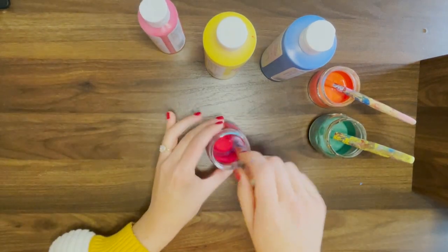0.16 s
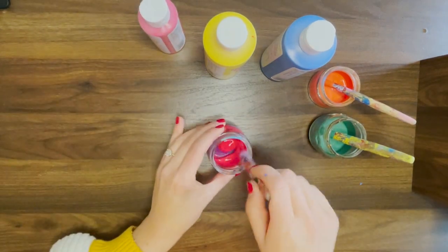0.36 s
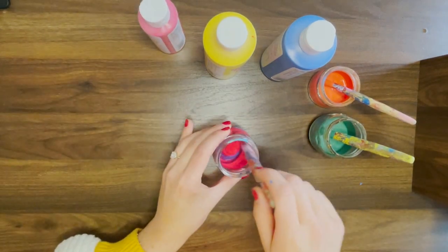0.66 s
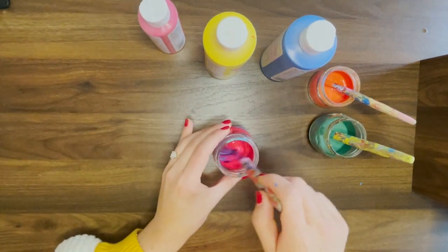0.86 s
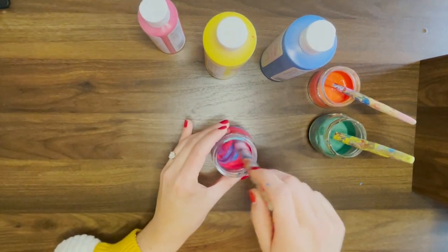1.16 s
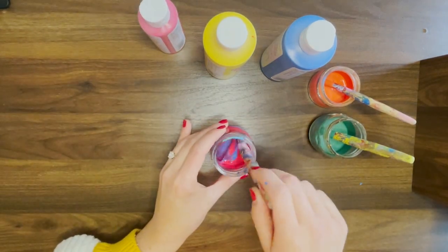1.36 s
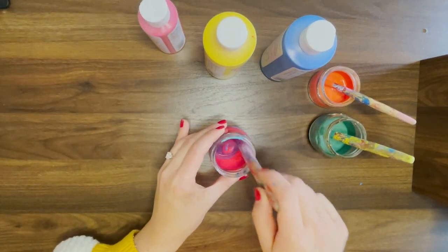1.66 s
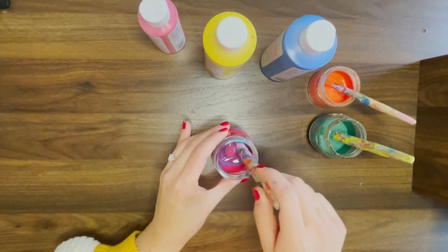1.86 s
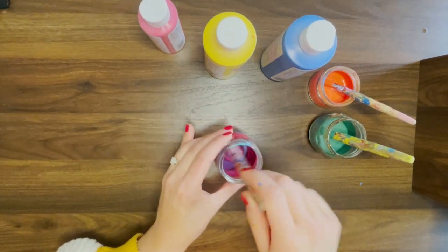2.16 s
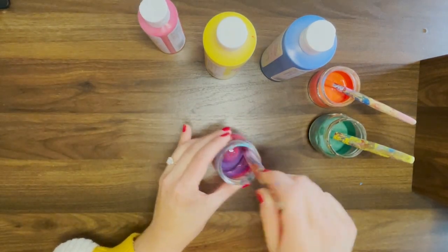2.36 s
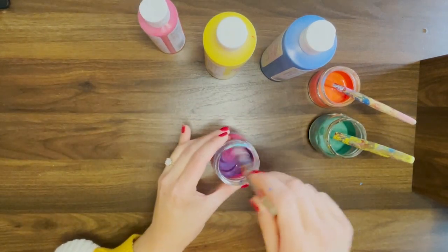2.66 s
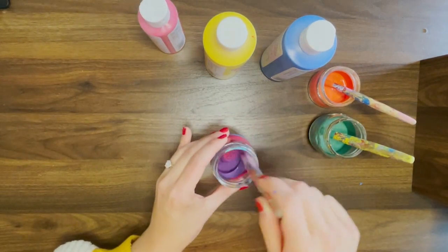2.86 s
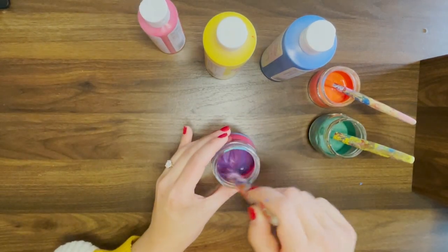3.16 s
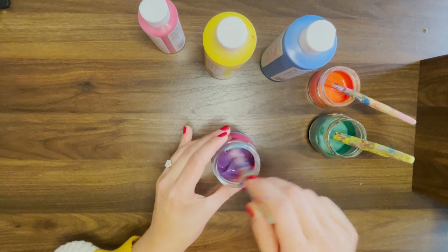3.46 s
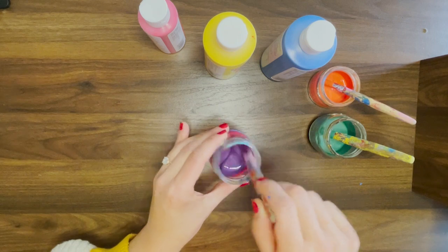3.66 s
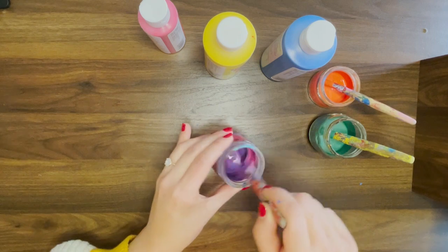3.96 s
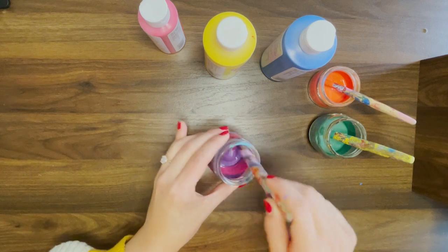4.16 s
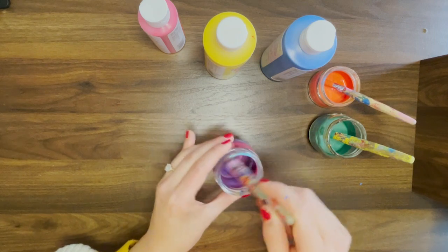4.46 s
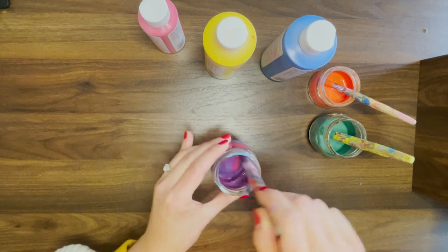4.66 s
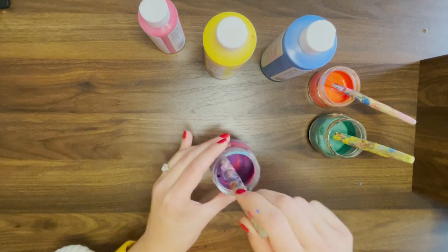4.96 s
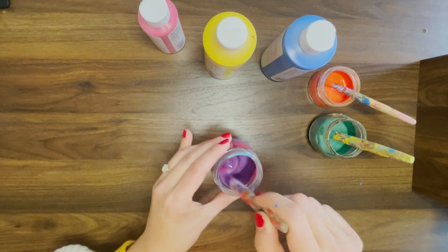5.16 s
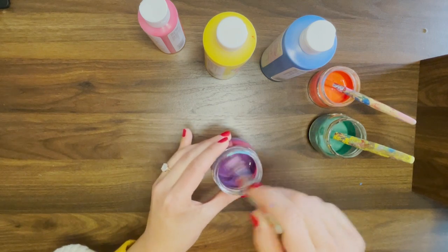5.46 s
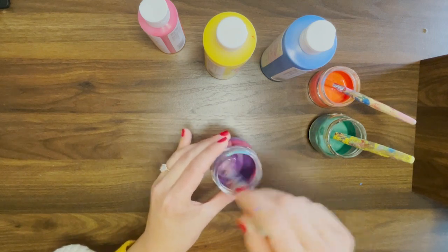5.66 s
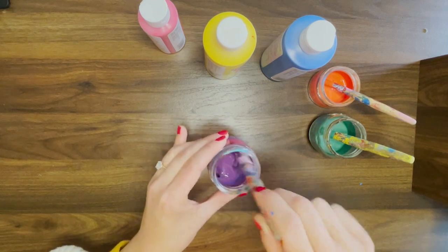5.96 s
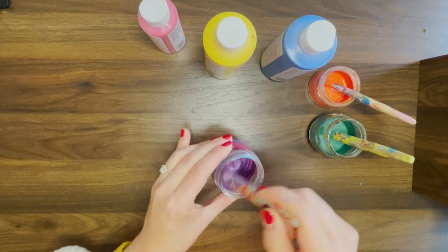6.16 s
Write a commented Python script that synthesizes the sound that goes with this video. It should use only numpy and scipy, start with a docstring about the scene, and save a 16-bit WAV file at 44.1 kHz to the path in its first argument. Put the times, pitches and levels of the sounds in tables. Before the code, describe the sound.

A paintbrush stirs paint in a small glass jar on a wooden table. The handle clicks against the glass several times a second, unevenly, mixing light ticks with sharper, briefly ringing clinks. Between them come faint wet rubbing and soft bristle swishes. The clicks soften for a while, then return and are strongest near the end. Heard close up in a quiet room with a low rumble.

```python
"""A brush handle clicks on the rim of a hand-held glass jar as paint is stirred at a wooden table.
Each impact excites the damped modes of the glass and of the air inside. Between clicks the handle rubs
the wet wall by stick-slip friction, the bristles swish, and the sliding jar drives the table's resonances.
Two close microphone ports above hear this in a quiet room, with low rumble and a faint appliance hum."""
import sys
import numpy as np
from scipy import signal
from scipy.fft import rfft, irfft, next_fast_len
from scipy.io import wavfile

SR = 44100
rng = np.random.default_rng(int(sys.argv[2]) if len(sys.argv) > 2 else 0)


def persist_wave(psi):
    """Save psi, clipped to +-1, as 16-bit WAV."""
    counts = np.round(np.clip(psi, -1, 1) * 32767).astype(np.int16)
    wavfile.write(sys.argv[1], SR, np.atleast_2d(counts).T)


N = 278963

# Background spectrum: f/Hz, relative density level/dB
RUMBLE_SPECTRUM = [(12, -45.5), (30, -8), (45, -1), (90, -0.5), (125, 0.5), (260, -10), (370, -17.5),
                   (600, -21.5), (830, -23.5), (1500, -25.5), (3000, -41.5), (6000, -49), (12000, -61.5),
                   (14000, -89)]
# Likeness of the rumble at the two ports: f/Hz, correlation
RUMBLE_COHERENCE = [(30, .9), (190, 0.75), (300, 0.31), (640, 0.036), (3000, 0.12)]
# Appliance tones: f/Hz, bandwidth/Hz, level/dB
HUM_TONES = [(672, 7.0, -83), (830, 7.0, -77.5), (950, 10.0, -89.5)]
# Reverberation time: f/Hz, t60/s
ROOM_DECAY = [(500, 0.093), (1500, 0.38), (6000, 0.33), (11000, 0.13), (15000, 0.033)]
# Reverberant spectrum: f/Hz, level/dB
ROOM_SPECTRUM = [(500, -6), (1500, -10.5), (3000, -8.5), (6000, -8), (11000, -3.5), (12800, -31.5),
                 (15000, -40.5)]
# Jar foot dragging on the table: t/s, duration/s, level/dB
JAR_SLIDES = [(0.006, 0.054, -43), (2.277, 0.0097, -53), (2.929, .04, -61.5), (3.873, 0.017, -63.5)]
# Table modes, a list per slide (the last two slides share one): f/Hz, bandwidth/Hz, level/dB
BOARD_MODES = [
    [(363, 8.1, 10), (417, 42, 5.5), (530, 88, -5.5), (960, 41, -8.5)],
    [(293, 18, -3), (448, 190, 2), (749, 390, -25), (1650, 800, 5.5)],
    [(290, 26, 0.5), (445, 99, -16), (840, 58, -12), (910, 80, 4)],
]
# Bristle sweeps through the paint: t/s, duration/s, level/dB
BRISTLE_SWEEPS = [(.07, 0.02, -63), (.31, 0.085, -75), (.6, 0.035, -74), (.98, .04, -83), (1.12, 0.56, -79),
                  (1.72, 0.013, -69), (2.03, 0.022, -70.5), (2.2, 0.14, -67), (2.45, 0.071, -67),
                  (2.72, 0.13, -69.5), (3.12, 0.08, -72), (3.3, 0.03, -74), (3.45, 0.23, -67),
                  (3.8, 0.039, -72), (3.93, 0.26, -73.5), (4.1, 0.19, -71), (4.55, 0.058, -64.5),
                  (4.72, 0.096, -70), (5.07, 0.049, -67), (5.3, .1, -62.5), (5.5, 0.2, -69),
                  (5.88, 0.11, -69.5), (6.05, .1, -74), (6.17, 0.042, -66.5), (6.29, .04, -73.5)]
# Spectrum of the swish: f/Hz, relative density level/dB
BRISTLE_SPECTRUM = [(2000, -10), (4000, -2.5), (5200, -2.5), (6400, 8.5), (8300, -16.5), (10000, -8.5),
                    (11700, -12), (12300, -14.5), (13500, -40)]
# Drags along the wet wall: t/s, duration/s, level/dB, relative smack level/dB
WALL_RUBS = [(0.137, 0.017, -66, 3.5), (.19, 0.024, -62, -9), (0.249, 0.018, -58.5, -6),
             (0.558, 0.03, -62, -16), (0.646, 0.029, -60.5, -10), (1.731, 0.021, -63.5, -6),
             (2.08, 0.069, -64, -6.5), (2.17, 0.092, -63.5, -13), (2.269, 0.013, -53.5, -8),
             (2.328, 0.063, -60, -6.5), (2.45, 0.076, -65.5, -3), (2.524, 0.057, -61.5, 0.5),
             (2.605, 0.049, -61, -13), (2.732, 0.05, -70, -3), (2.793, 0.017, -59, -2),
             (2.882, 0.028, -58.5, -10), (3.7, 0.14, -64, -10), (3.838, 0.019, -55.5, -17),
             (3.872, 0.028, -59.5, 1.5), (3.926, 0.024, -57, -3.5), (3.985, .04, -63.5, -7),
             (4.06, 0.022, -55, 0.5), (4.12, 0.041, -66, 1), (4.264, 0.024, -64.5, -6.5),
             (4.622, 0.11, -70.5, 1), (4.706, 0.15, -65, -4), (5.107, 0.036, -61.5, 0),
             (5.135, 0.016, -53, -18), (5.53, 0.037, -50, -9), (5.693, 0.05, -62.5, -5),
             (5.895, 0.027, -65.5, -8), (5.97, 0.16, -73, -13), (6.101, 0.084, -60.5, -3.5),
             (6.171, 0.019, -56, -5.5), (6.286, 0.051, -59.5, -16)]
# Wet smacks of the paint film: f/Hz, level/dB, t60/s
FILM_MODES = [(1784, -3.5, .014), (2085, -3.5, 0.0092), (2320, -8, 0.007), (6100, -12, 0.01)]
# Modes of the enclosed air (lowest four), then of wall and rim: f/Hz, level/dB, t60/s
JAR_MODES = [(1120, -8, 0.0059), (1333.5, -2.5, 0.023), (1482.5, 5, 0.013), (1740, -7, 0.021),
             (2000, -15.5, 0.0055), (2715, -4, 0.012), (3425, -6.5, 0.0012), (4227, -10, 0.01),
             (4790, -4, 0.009), (5320, -13, 0.034), (5788.4, 0.5, 0.045), (5842, 3, 0.034),
             (6050, -17.5, .04), (6720, -0.5, 0.01), (10500, -13, 0.0027), (11270, -3, 0.003),
             (14800, -14, .006)]
# Four bands that set the timbre (air thump, wall, glass ring, tick): f/Hz
BAND_HZ = [1450, 3200, 5800, 11000]
# Timbre of rubbing: relative level/dB in each band
RUB_BAND_DB = [1.5, -12.5, -16.5, -34.5]
# Noise burst of an impact: f/Hz, relative level/dB
CRACK_SPECTRUM = [(700, -47.5), (1000, -24.5), (1500, 4.5), (3000, 3), (5500, 2), (7300, 0.5), (8200, -13),
                  (11500, -12.5), (13000, -17), (16500, -23)]
# Handle striking glass: t/s, level/dB, then relative level/dB in each of the four bands
HANDLE_IMPACTS = [(0.068, -24.5, -11.5, -11, -21.5, -14.5), (0.156, -34.5, -14, -16, -24, -45),
                  (0.241, -42, -4, -29, -17, -23), (0.27, -38.5, -10.5, -13.5, -8.5, -15),
                  (0.361, -18.5, -13.5, -15, -9.5, -22), (0.527, -40, -10.5, -17, -18.5, -17),
                  (0.57, -36.5, -11, -14, -17.5, -17), (0.644, -39, -10, -30, -30, -26),
                  (0.931, -31, -8.5, -11, -8, -18), (1.059, -41, -8, -11, -27.5, -19),
                  (1.155, -16.5, -10, -17.5, -5, -18.5), (1.251, -30, -8.5, -14, -15.5, -14),
                  (1.364, -6.5, -10, -18, -3.5, -11), (1.47, -18, -8.5, -10, -4.5, -4),
                  (1.661, -24.5, -6, -23.5, -23.5, -17), (1.868, -32, -4, -17, -13, -16.5),
                  (1.973, -24.5, -6.5, -13.5, -15.5, -13), (2.077, -48.5, -2, -15, -30.5, -32.5),
                  (2.341, -32.5, -10, -31.5, -16.5, -49), (2.424, -42.5, -1.5, -20, -16.5, -28),
                  (2.484, -46.5, -5, -12, -12, -6), (2.522, -44, -3.5, -11, -10.5, -44),
                  (2.544, -37, -4, -27, -32, -25), (2.613, -43, -11, -40, -39, -54.5),
                  (2.626, -38, -6, -37, -29, -27), (2.784, -26.5, -7, -15.5, -19.5, -14),
                  (2.874, -44, -1, -34, -39, -28), (3.139, -22, -5.5, -19, -15, -11),
                  (3.297, -51, -25, -24.5, -14, 1), (3.331, -42, -8.5, -14.5, -18, -7),
                  (3.429, -9, -8.5, -21, -6, -15.5), (3.603, -18, -5.5, -17.5, -15.5, -13.5),
                  (3.83, -37, -3.5, -14.5, -15.5, -14), (4.055, -33.5, -11.5, -24, -23.5, -36),
                  (4.185, -23.5, -9, -12, -20, -7.5), (4.381, -14.5, -5.5, -16.5, -16.5, -13.5),
                  (4.561, -20, -12, -19.5, -11.5, -17.5), (4.666, -38, -19, -3, -17, -9),
                  (4.837, -38.5, -7.5, -25.5, -39, -36), (4.94, -11.5, -11.5, -8.5, -20, -20),
                  (5.063, -26, -11.5, -18.5, -19.5, -25), (5.212, -35, 0, -34, -34.5, -19),
                  (5.318, -9.5, -9, -21.5, -9, -10), (5.433, -6, -16, -14, -8, -11.5),
                  (5.507, -20, -13, -29, -15, -18), (5.679, -24.5, -8.5, -20.5, -27, -27),
                  (5.838, -21, -10, -8.5, -22.5, -23), (5.968, -47, -4, -30, -19, -21),
                  (6.17, -41.5, -4, -18, -15.5, -14), (6.288, -49.5, -9.5, -2, -28, -10),
                  (6.305, -32, -20, -13, -11.5, 0)]


def from_db(db):
    """Amplitude ratio of a level in decibels."""
    return 10 ** (np.asarray(db) / 20)


def unit_rms(x):
    """Normalisation to unit mean power."""
    return x / np.sqrt(np.mean(x ** 2) + 1e-20)


def bin_hz(size):
    """Fourier frequencies, held above zero for a logarithmic axis."""
    return np.maximum(np.fft.rfftfreq(size, 1 / SR), 1)


def at_hz(points, hz):
    """Interpolation of (frequency, value) points over log frequency."""
    points = np.array(points)
    return np.interp(np.log(hz), np.log(points[:, 0]), points[:, 1])


def timbre_db(band_db, hz):
    """Spectral envelope through the four band levels."""
    return at_hz(list(zip(BAND_HZ, band_db)), hz)


def butterworth(x, order, hz, kind):
    """Filtering with a maximally flat passband."""
    return signal.sosfilt(signal.butter(order, hz, kind, fs=SR, output="sos"), x)


def drift(rate_hz):
    """Slow random modulation of unit rms: noise through two one-pole low-passes."""
    step, settle = 16, 3000
    pole = np.exp(-2 * np.pi * rate_hz * step / SR)
    noise = rng.standard_normal(N // step + settle + 2)
    slow = signal.lfilter([1], [1, -2 * pole, pole * pole], noise)[settle:]
    return np.interp(np.arange(N) / step, np.arange(len(slow)), unit_rms(slow))


def ring(force, hz, t60):
    """Damped oscillator: a unit impulse starts a decaying sine of unit amplitude."""
    r, w = from_db(-60 / (t60 * SR)), 2 * np.pi * hz / SR
    return signal.lfilter([0, np.sin(w)], [1, -2 * r * np.cos(w), r * r], force + 1e-18)


def resonance(force, hz, width_hz):
    """Forced response at unit rms; decay time is inversely proportional to bandwidth."""
    return unit_rms(ring(force, hz, np.log(1000) / (np.pi * width_hz)))


def strike(blows, hz, t60, contact_s=0.0045):
    """Finite contact time: a short ring drives the mode, which swells before it decays."""
    return ring(ring(blows, hz, contact_s), hz, t60) * 2 * np.log(1000) / (contact_s * SR)


def strokes(rows, rise_db_per_s, fall_db_per_s):
    """Level in dB of each stroke: exponential growth up to its start, a hold, exponential decay."""
    t = np.arange(N) / SR
    return [db - rise_db_per_s * np.maximum(start - t, 0)
            - fall_db_per_s * np.maximum(t - start - duration, 0)
            for start, duration, db, *_ in rows]


def loudest(levels_db, rest_db):
    """Upper envelope of the strokes, never below the resting level."""
    return np.maximum(np.max(levels_db, axis=0), rest_db)


def impulses(per_s, uneven_db, limit):
    """Poisson impulses of random sign, their levels spread over at most limit * uneven_db."""
    occurs = rng.random(N) < per_s / SR
    level_db = uneven_db * np.minimum(rng.exponential(1, N), limit)
    return occurs * from_db(level_db) * rng.choice([-1, 1], N)


def rumble(level_db=-60.5):
    """Distant air and traffic noise, coherent between the ports only at long wavelengths."""
    size = next_fast_len(N)
    hz = bin_hz(size)
    mid, side = rfft(rng.standard_normal((2, size))) * from_db(at_hz(RUMBLE_SPECTRUM, hz))
    coherence = np.clip(at_hz(RUMBLE_COHERENCE, hz), 0, 1)
    spectra = np.sqrt(1 + coherence) * mid + np.sqrt(1 - coherence) * side * [[1], [-1]]
    pair = unit_rms(irfft(spectra, size)[:, :N])
    swell_db = 1.2 * drift(1.5)
    return from_db(level_db + swell_db) * pair * from_db([[-2.0], [2.0]])  # weaker on the left


def hum():
    """Appliance hum: narrow-band noise is heard as wavering tones, uncorrelated between the ports."""
    return sum(from_db(db) * resonance(rng.standard_normal((2, N)), hz, width)
               for hz, width, db in HUM_TONES)


def room(source, gap_s=0.00087, ceiling_s=0.0143, ceiling_db=-18):
    """Reverberation: a diffuse field decays exponentially in each band; the ceiling adds one echo."""
    t, tail = np.arange(SR // 2) / SR, 0
    edges = 350 * 2 ** np.arange(0, 6, .5)  # half octaves
    for low, high in zip(edges, edges[1:]):
        hz = np.sqrt(low * high)
        band = butterworth(rng.standard_normal((2, len(t))), 2, [low, high], "band")
        t60 = at_hz(ROOM_DECAY, hz)
        decay = from_db(at_hz(ROOM_SPECTRUM, hz) - 60 * t / t60)
        tail = tail + band * decay / np.sqrt(t60 * SR / np.log(1e6))
    tail = tail * np.clip(t / gap_s - 1, 0, 1)  # silent until the first reflection
    echo = round(ceiling_s * SR)
    tail[:, echo:echo + 3] += from_db(ceiling_db) * np.array([.25, .5, .25])  # smeared, so duller
    return signal.fftconvolve(source[None], tail, axes=1)[:, :N]


def jar_slides():
    """Forced vibration: the glass foot judders over the grain and drives the modes of the board."""
    levels_db = strokes(JAR_SLIDES, rise_db_per_s=500, fall_db_per_s=278)
    out = 0
    for level_db, modes in zip(levels_db, BOARD_MODES + BOARD_MODES[-1:]):
        judder = rng.standard_normal(N) * from_db(3.4 * drift(85.0))
        board = sum(from_db(db) * resonance(judder, hz, width) for hz, width, db in modes)
        out = out + from_db(level_db) * unit_rms(board)
    return out


def bristle_swish():
    """Shot noise: hairs peel off the sticky wall in snaps so dense that they merge into a swish."""
    sweep_db = loudest(strokes(BRISTLE_SWEEPS, rise_db_per_s=249, fall_db_per_s=201.5), rest_db=-86)
    snaps = impulses(per_s=4900.0, uneven_db=5.0, limit=3)
    flicker_db = 3.5 * drift(18.0)
    size = next_fast_len(N)
    spectrum = rfft(snaps, size) * from_db(at_hz(BRISTLE_SPECTRUM, bin_hz(size)))
    return from_db(sweep_db + flicker_db) * unit_rms(irfft(spectrum, size)[:N])


def wall_rubbing(slips_per_s=1100.0, clumps_db=4.5):
    """Stick-slip friction: clusters of tiny contacts excite the jar and the wet paint film."""
    levels_db = strokes(WALL_RUBS, rise_db_per_s=900, fall_db_per_s=263)
    smack_db = np.array(WALL_RUBS)[np.argmax(levels_db, axis=0), 3]  # set by the strongest drag
    slips = impulses(slips_per_s * from_db(clumps_db * drift(30.0)), uneven_db=4.5, limit=4)
    jar, film = 0, 0
    for hz, mode_db, t60 in JAR_MODES:  # each mode takes a random half of the slips
        gain = from_db(mode_db + timbre_db(RUB_BAND_DB, hz))
        jar = jar + gain * strike(slips * (rng.random(N) < .5), hz, t60)
    for hz, mode_db, t60 in FILM_MODES:
        film = film + from_db(mode_db) * strike(slips * (rng.random(N) < .5), hz, t60)
    envelope = from_db(loudest(levels_db, rest_db=-79.5))
    rubbing = envelope * (unit_rms(jar) + from_db(smack_db) * unit_rms(film))
    return butterworth(rubbing, 2, 900, "high")


def contact_crack(level_db, band_db, size, rise_s=0.0013):
    """A brief contact has a broad spectrum: a noise burst that peaks at rise_s and dies away."""
    t, hz = np.arange(size) / SR, bin_hz(size)
    spectrum_db = level_db + at_hz(CRACK_SPECTRUM, hz) + timbre_db(band_db, hz)
    noise = irfft(rfft(rng.standard_normal(size)) * from_db(spectrum_db))
    return noise * t / rise_s * np.exp(1 - t / rise_s)


def handle_clicks(chatter_s=0.0018, bounce_db=-9, modes_db=-3, lobe_db=4.5, crack_samples=512):
    """Modal superposition: each impact and its weaker bounce ring all the jar's modes, over a crack."""
    impacts = np.array(HANDLE_IMPACTS)
    count, levels_db, bands_db = len(impacts), impacts[:, 1], impacts[:, 2:6]
    onsets = (impacts[:, 0] * SR).astype(int)
    bounce_delays = (chatter_s * SR * (1 + rng.random(count))).astype(int)
    bounces = np.minimum(onsets + bounce_delays, N - 1)
    signs = rng.choice([-1, 1], (count, len(JAR_MODES)))
    signs[:, 0] = -signs[:, 1]  # in antiphase, the lowest two modes fill the gap between them
    out = np.zeros((2, N + crack_samples))
    for sign, (hz, mode_db, t60) in zip(signs.T, JAR_MODES):
        colour_db = np.array([timbre_db(band_db, hz) for band_db in bands_db])
        blows = sign * from_db(levels_db + colour_db + mode_db + modes_db)
        # Rim modes radiate in lobes: louder and one sample later at the left port.
        left = (1, from_db(lobe_db)) if 4000 < hz < 7500 else (0, 1)
        force = np.zeros_like(out)
        for port, (delay, gain) in enumerate([left, (0, 1)]):
            force[port, onsets + delay] = blows * gain
            force[port, bounces + delay] += blows * gain * from_db(bounce_db)
        out += strike(force, hz, t60)
    for onset, level_db, band_db in zip(onsets, levels_db, bands_db):
        out[:, onset:onset + crack_samples] += contact_crack(level_db, band_db, crack_samples)
    return butterworth(out[:, :N], 4, 800, "high")  # so small a jar radiates no bass


def scene(port_lag_s=0.00009):
    """Superposition of direct sound, room and background; the nearer, left port hears the jar first."""
    near = handle_clicks() + wall_rubbing() + bristle_swish() + jar_slides()
    size = next_fast_len(N + 64)
    lag = np.exp(-2j * np.pi * np.fft.rfftfreq(size, 1 / SR) * port_lag_s)
    right = irfft(rfft(near[1], size) * lag, size)[:N]
    direct = np.array([near[0], right]) * from_db([[.4], [-.4]])
    return direct + room(near.mean(axis=0)) + rumble() + hum()


def record(dry, ceiling=0.95, stopband_hz=17000):
    """Soft saturation rounds the highest peaks; a steep low-pass removes the top of the treble."""
    rounded = dry / (1 + (dry / ceiling) ** 8) ** .125
    return signal.sosfilt(signal.cheby2(12, 70, stopband_hz, fs=SR, output="sos"), rounded)


dry = scene()
out = record(dry)
persist_wave(out)
```